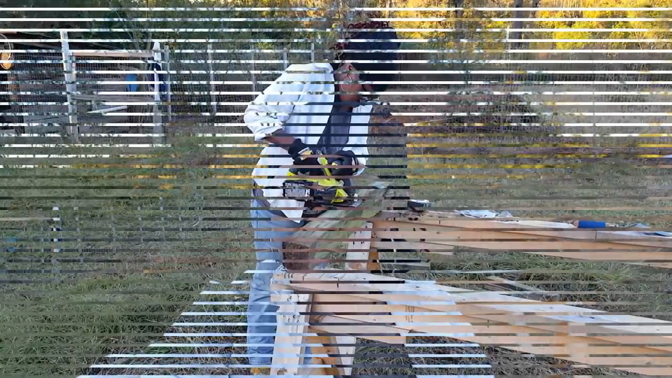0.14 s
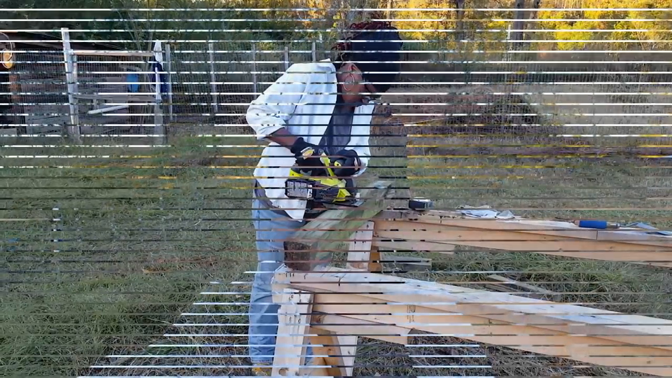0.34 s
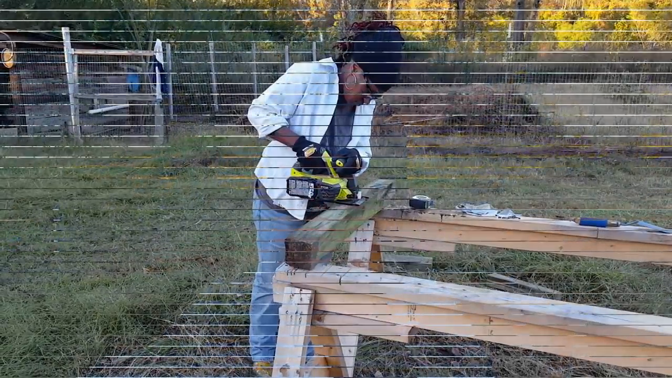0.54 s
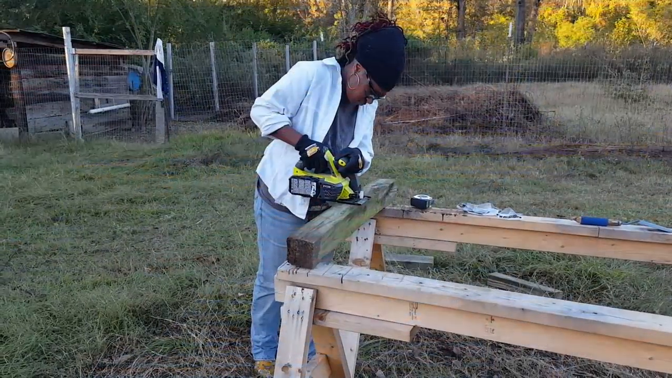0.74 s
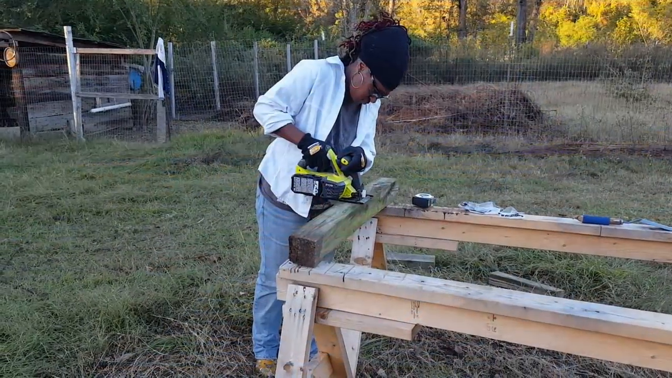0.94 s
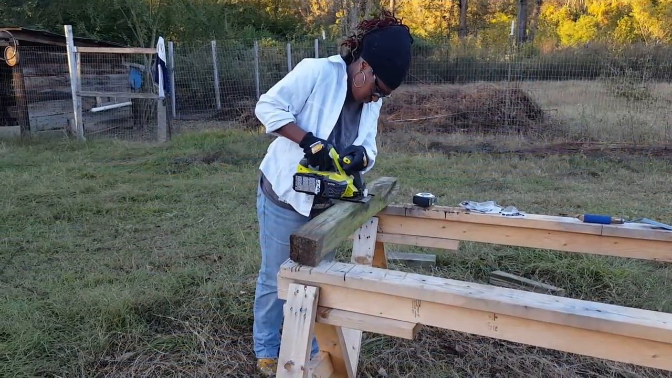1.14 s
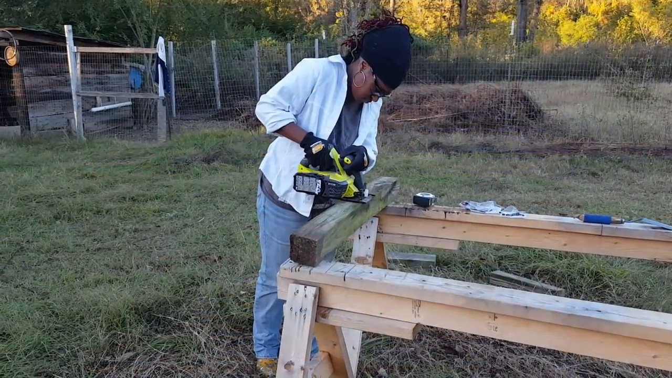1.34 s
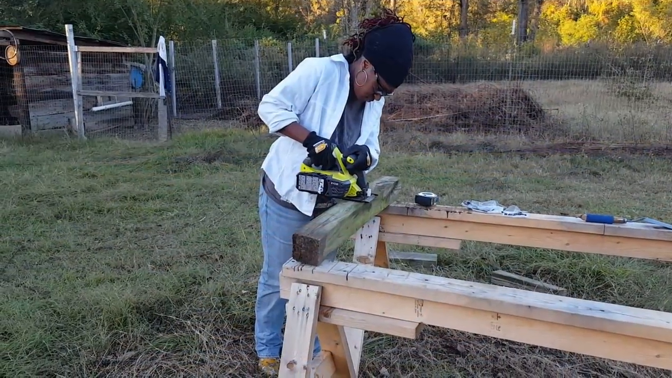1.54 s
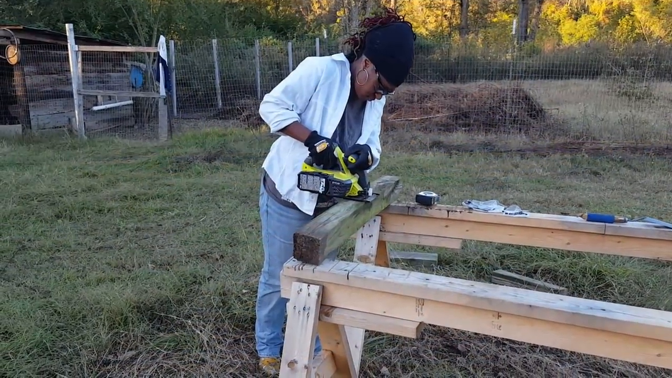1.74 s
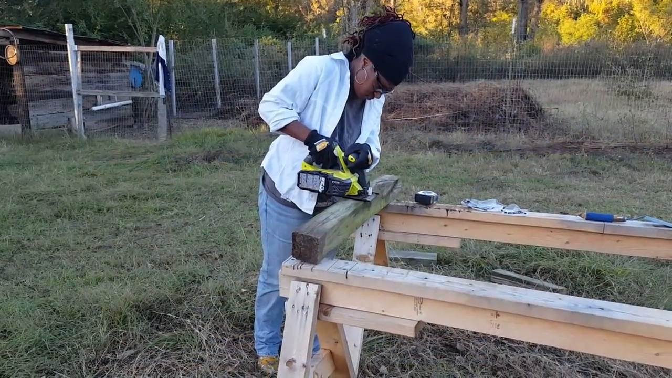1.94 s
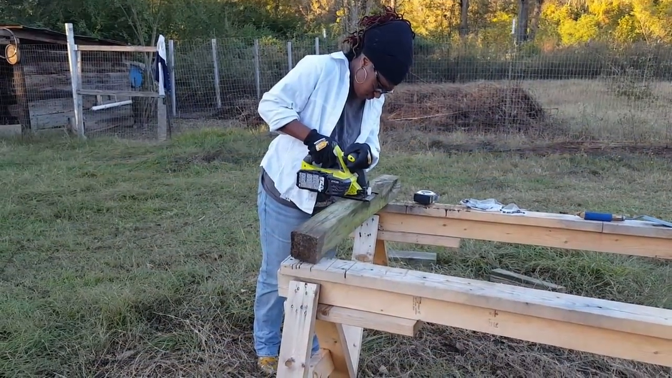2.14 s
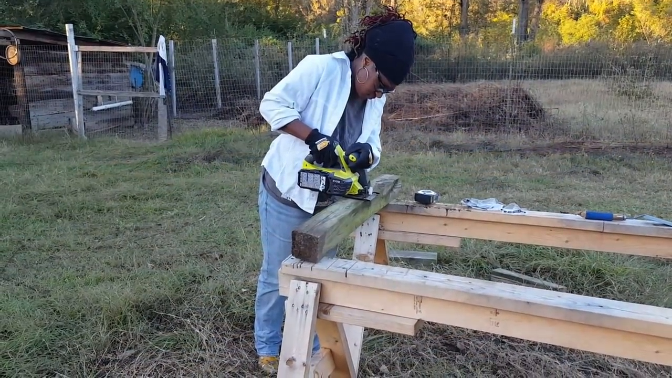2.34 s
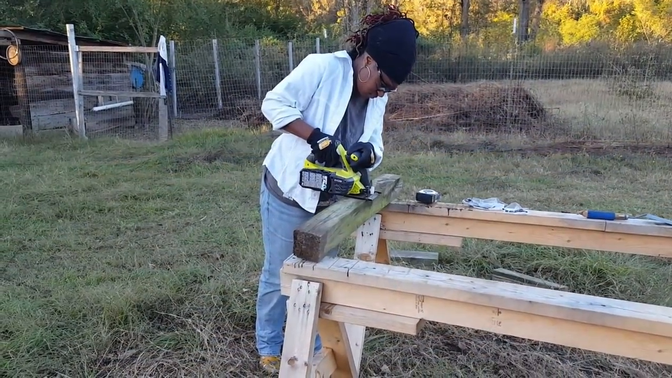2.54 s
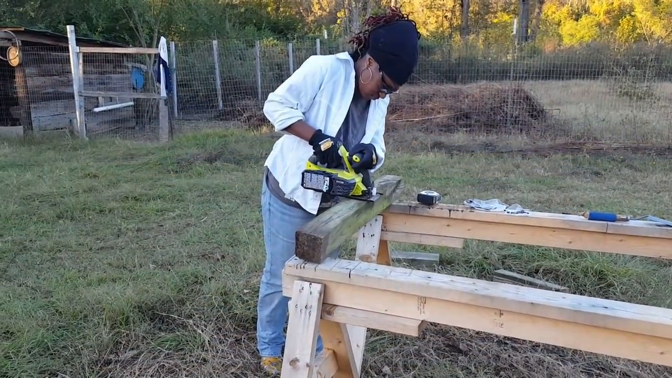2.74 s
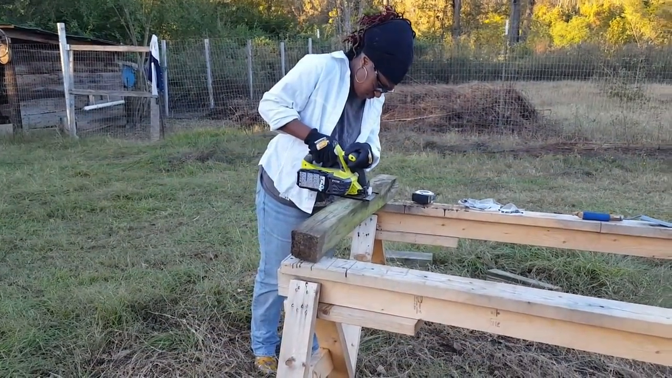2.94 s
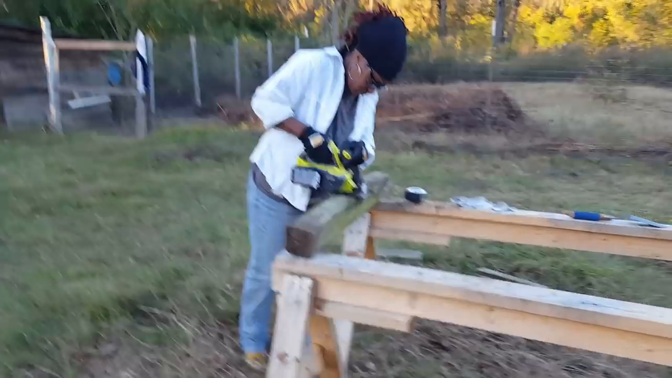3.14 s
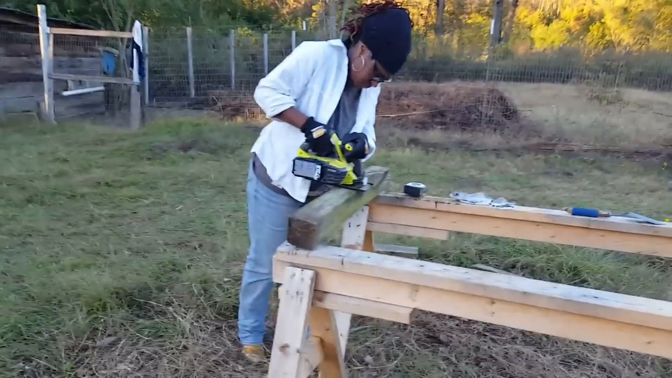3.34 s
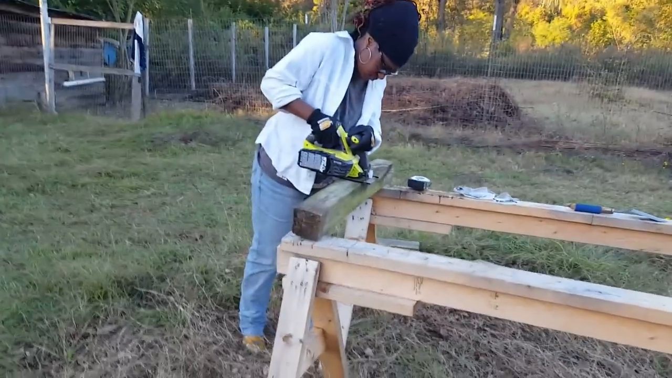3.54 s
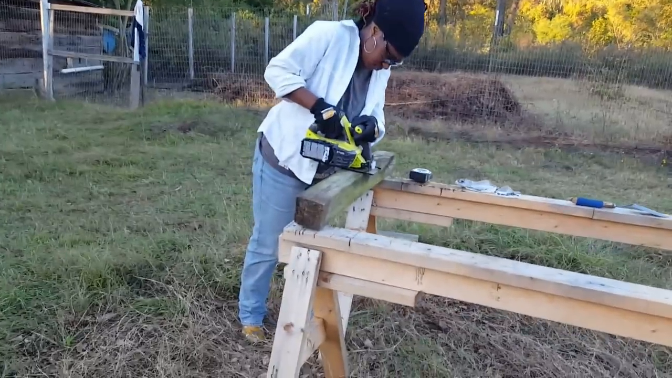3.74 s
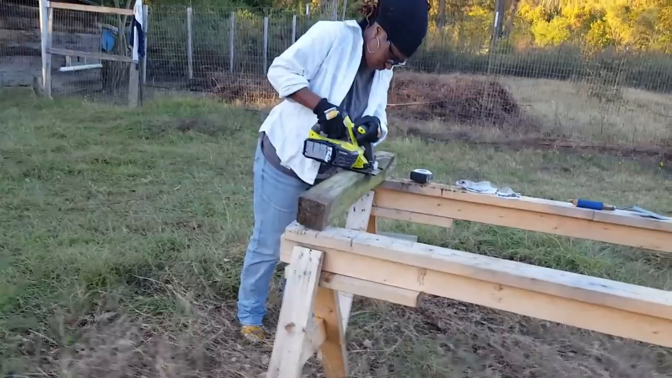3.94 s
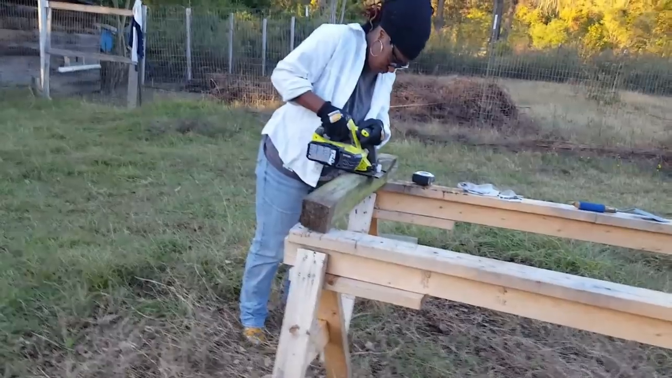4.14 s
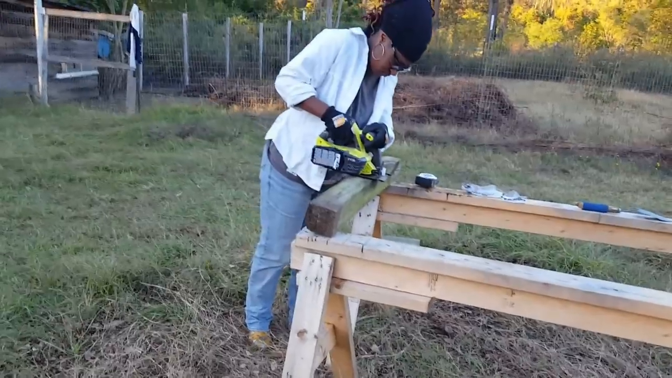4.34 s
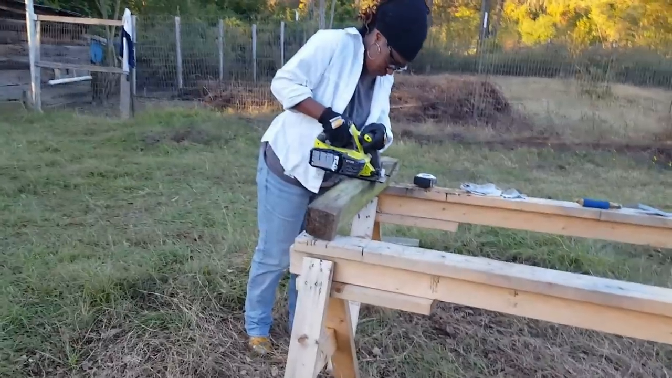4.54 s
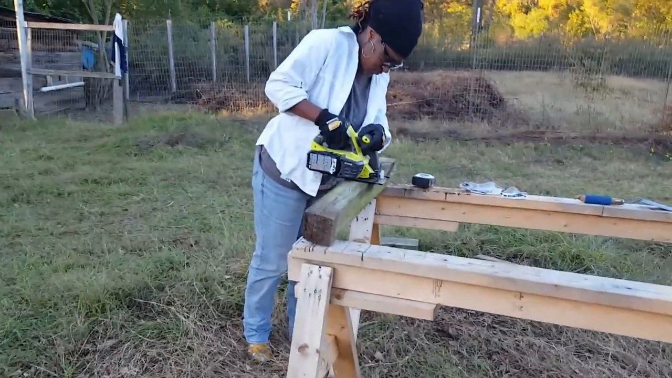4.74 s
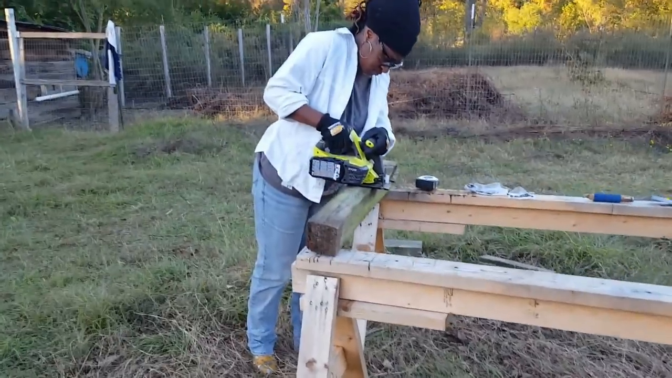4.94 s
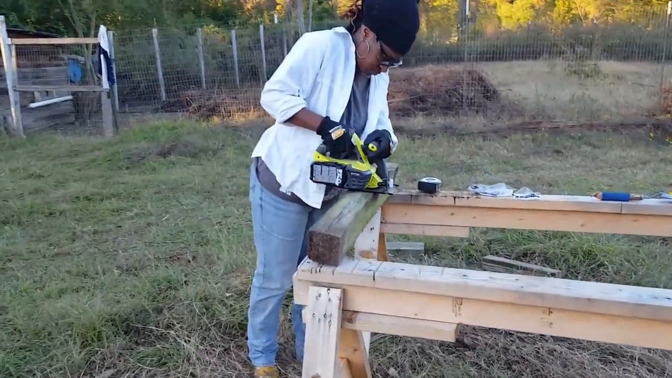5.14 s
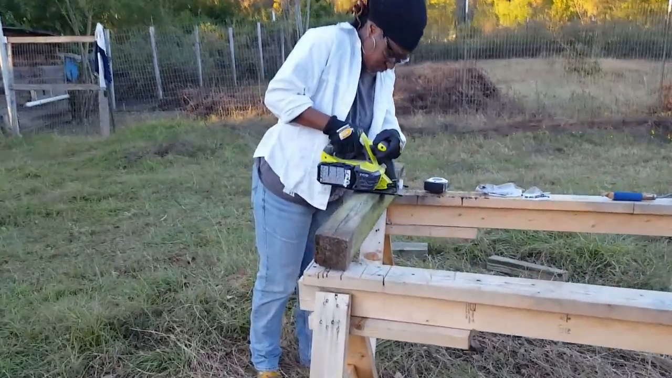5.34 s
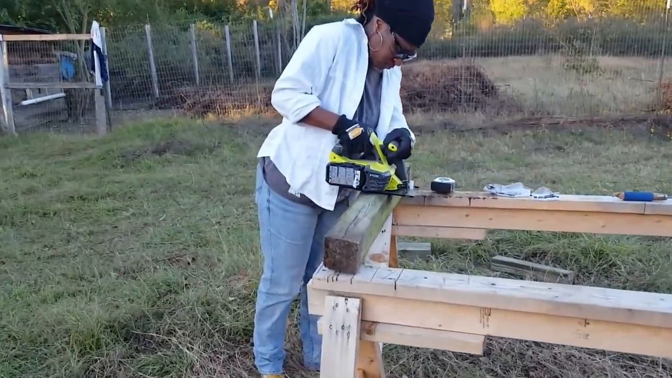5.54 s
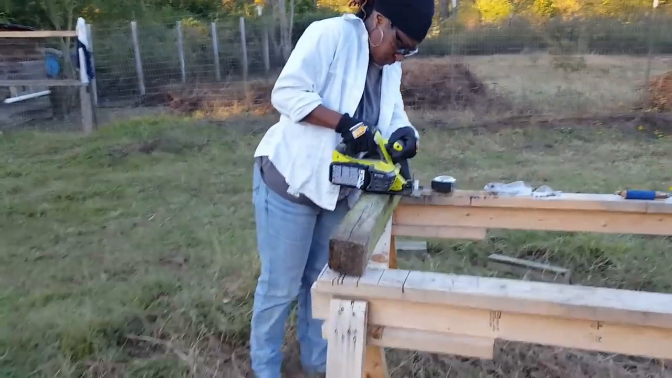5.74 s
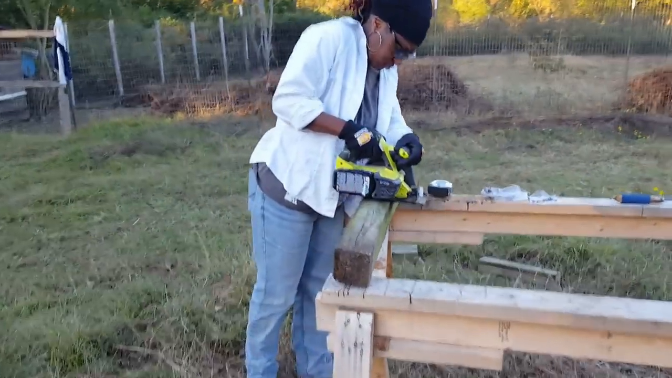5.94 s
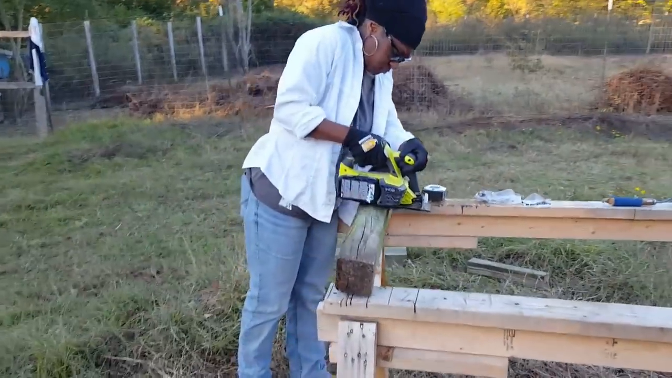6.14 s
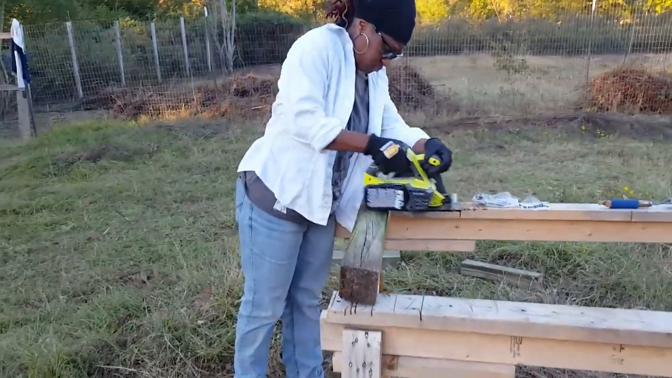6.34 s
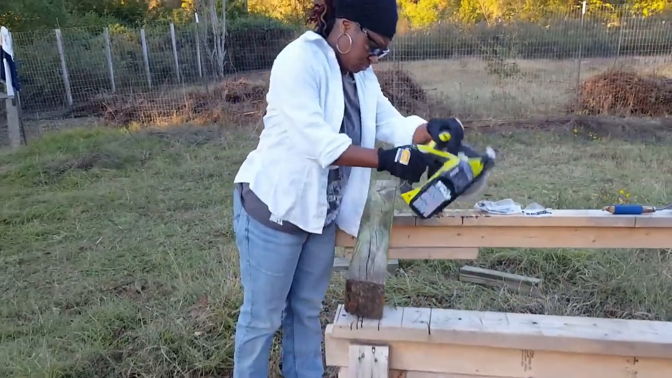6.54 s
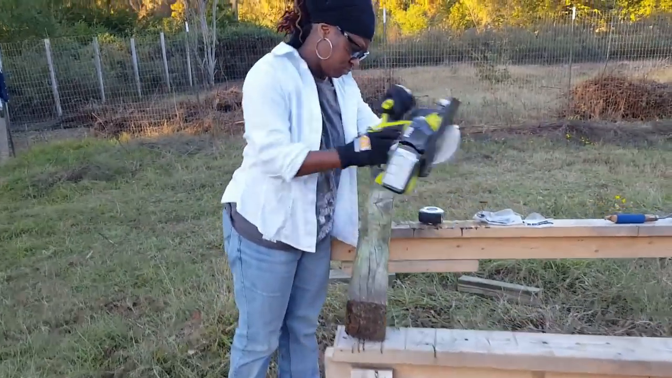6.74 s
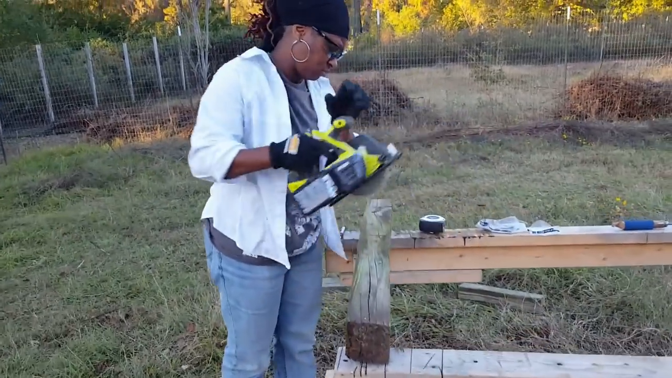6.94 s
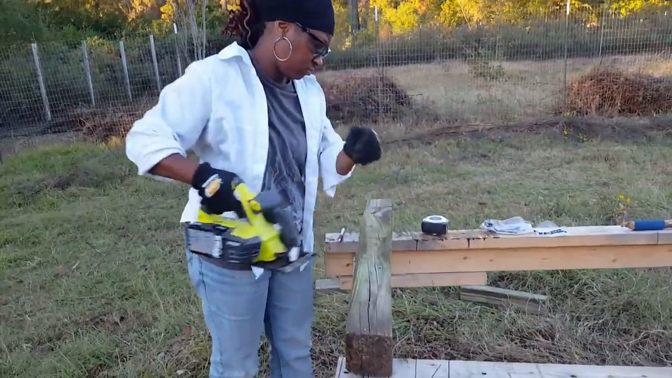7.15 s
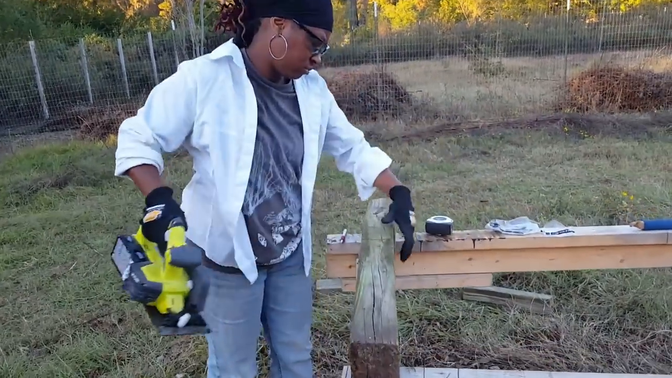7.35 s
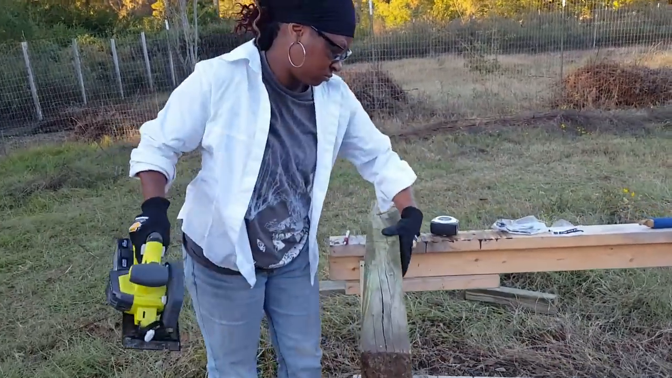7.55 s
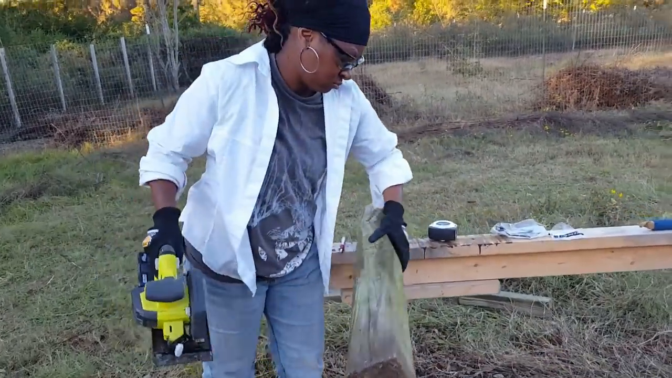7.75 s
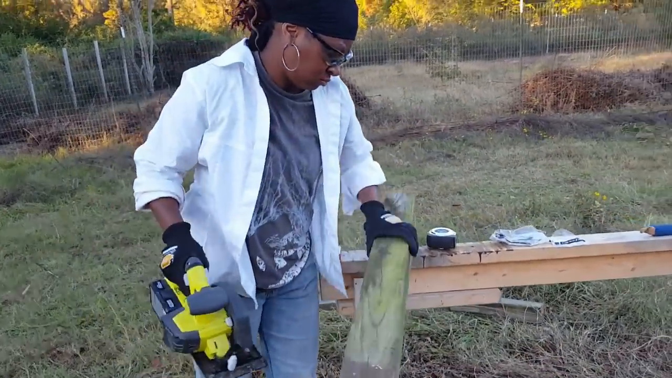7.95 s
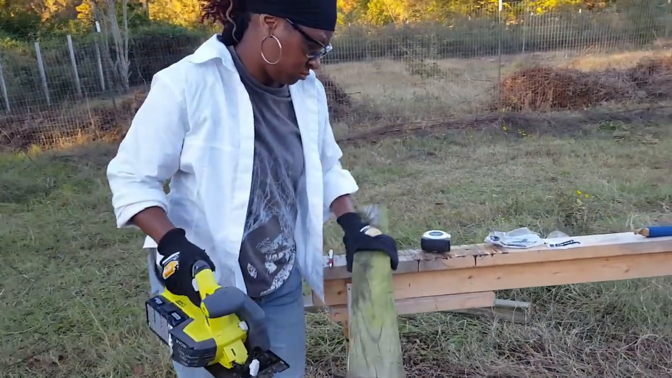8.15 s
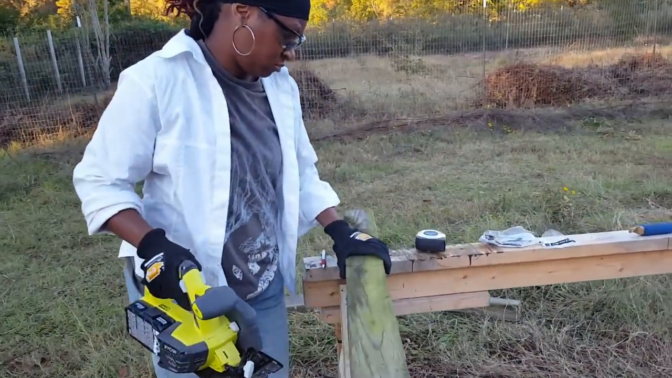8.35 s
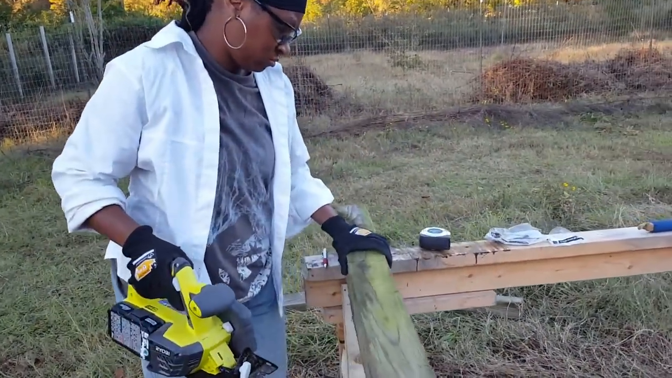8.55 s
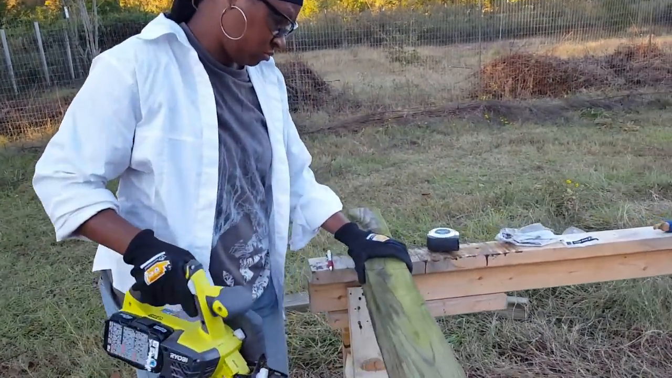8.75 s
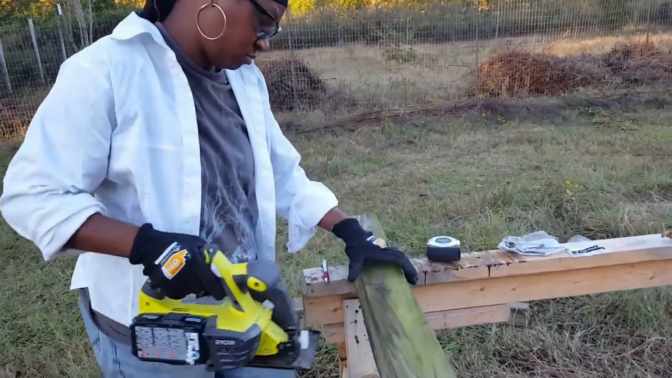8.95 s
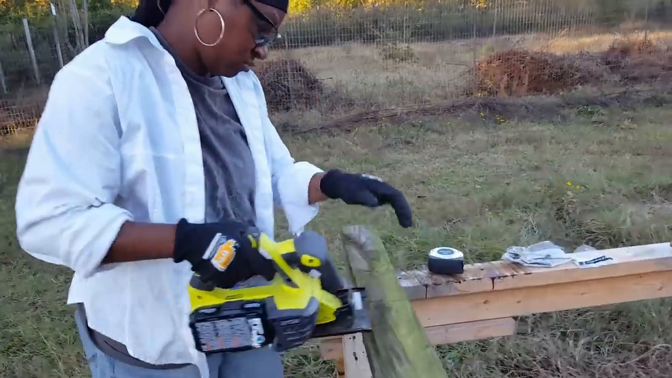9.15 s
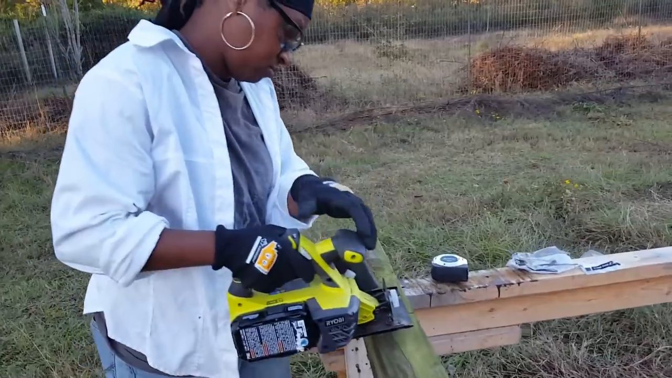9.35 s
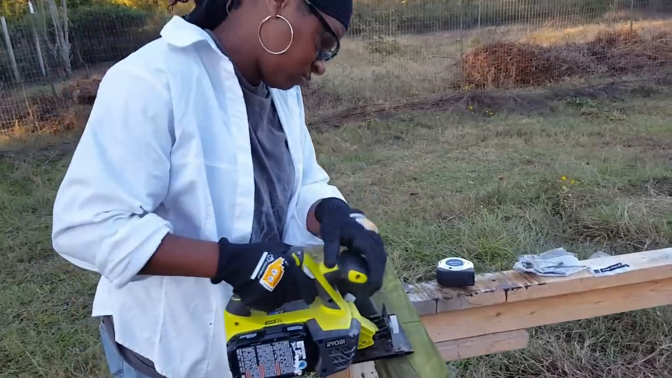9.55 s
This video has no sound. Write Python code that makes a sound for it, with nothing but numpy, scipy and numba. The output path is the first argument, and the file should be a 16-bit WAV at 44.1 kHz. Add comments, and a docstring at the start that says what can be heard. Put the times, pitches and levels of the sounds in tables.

```python
"""A small cordless saw bites through a wooden post in an open field, a few metres from a hand-held camera.
First come quick bursts of noise as the teeth strike and ring steel and housing, with whines of motor and gears.
Near 6.5 s the saw breaks free; it coasts down to single clacks while it is carried to the left.
Near 8.3 s the post is rolled over and knocks on its trestle: short pushes into decaying timber modes.
Two fainter knocks end it; filtered noise gives the still air underneath."""
import sys
import numpy as np
from scipy import signal
from scipy.fft import rfft, irfft, next_fast_len
from scipy.io import wavfile
from scipy.ndimage import uniform_filter1d, map_coordinates
from numba import njit

SR = 44100
rng = np.random.default_rng(int(sys.argv[2]) if len(sys.argv) > 2 else 0)


def dump_mix(stems):
    """Bounce the given channels to the path in sys.argv[1] as a 16-bit WAV at rate SR."""
    frames = np.atleast_2d(stems).T  # one column per channel
    limited = np.clip(frames, -1, 1)  # hard clip at full scale
    pcm = np.round(limited * 32767).astype(np.int16)
    wavfile.write(sys.argv[1], SR, pcm)


N = 423801
T = np.arange(N) / SR  # time of every sample, s
M = next_fast_len(N + 8192)  # transform length, samples
F = np.arange(M // 2 + 1) * SR / M + 1e-3  # transform frequencies, Hz; kept above zero for the logarithm

# when the saw turns to a new posture towards the microphones: turn_s
# the six postures: shallow cut, deeper, nearly through, lifted, lowered, held low
TURNS_S = (4.55, 5.7, 6.47, 7.36, 8.4)
# colour of the side signal against the mid: hz, side_over_mid_db
SIDE_COLOUR = [(60, -8.5), (300, -8), (1400, -21), (3000, -12.5), (7000, -7), (15000, -2)]


def undb(db):
    """Gain of a dB value."""
    return 10 ** (np.asarray(db) / 20)


def shape(table):
    """Gain at every frequency, joining (hz, db) points along a logarithmic frequency axis."""
    hz, db = np.transpose(table)
    return undb(np.interp(np.log(F), np.log(hz), db))


def through(x, gain):
    """Filter by a frequency response without phase shift."""
    return irfft(rfft(x, M) * gain, M)[..., :N]


def columns(table):
    """Every column of a timed table at every sample, joined by straight lines."""
    s, *rest = np.transpose(table)
    return [np.interp(T, s, column) for column in rest]


def wander(rate):
    """Random values joined by straight lines, rate of them a second."""
    return np.interp(T * rate, np.arange(400), rng.standard_normal(400))


@njit
def ring(x, hz, width):
    """State-variable band-pass on each channel, gain 1 at a centre that may move slowly."""
    y = np.empty_like(x)
    for channel in range(len(x)):
        band, low, g, damping = 0., 0., 0., 0.
        for i in range(len(hz)):
            if i % 32 == 0:
                g = np.tan(np.pi * hz[i] / SR)
                damping = width[i] / hz[i]
            v = (band + g * (x[channel, i] - low)) / (1 + g * (g + damping))
            band = 2 * v - band
            low = low + 2 * g * v
            y[channel, i] = damping * v
    return y


def postures():
    """Share of each posture at every sample, cross-faded over 0.26 s at each turn."""
    later = [np.clip((T - s) / 0.26 + .5, 0, 1) for s in TURNS_S]
    return -np.diff([np.ones(N)] + later + [np.zeros(N)], axis=0)


def field():
    """Faint still air over the grass: coloured noise, independent in mid and side."""
    # colour of the air, before its level is set: hz, relative_db
    air_colour = [(15, -18), (25, -12), (64, -14), (153, -8), (195, -18), (437, -10.5), (2090, -19.5),
                  (4000, -23), (14200, -33), (15900, -28)]
    mid_level_db = -54.5
    colour = shape(air_colour)
    mid, side = through(rng.standard_normal((2, N)), [colour, colour * shape(SIDE_COLOUR)])
    fade_in = np.clip((T - .054) / 0.25, 0, 1)
    return np.array([mid + side, mid - side]) * undb(mid_level_db) / np.std(mid) * fade_in


def hum():
    """Sines at the multiples of the shaft speed and passing whines, each wavering in pitch and level."""
    # drive shaft under load: time_s, shaft_hz, added_db
    shaft = [(0.06, 69, -4), (.5, 66.5, 2.5), (2.2, 66, 3.5), (4.2, 59.6, 4.5), (5.3, 48, 1)]
    # multiples of the shaft speed: order, level_db before the shaft's added_db
    shaft_orders = [(1, -64), (2, -94), (3, -64.5), (4, -107)]
    # whines of motor and gears, straight glides before waver: start_s, end_s, start_hz, end_hz, level_db
    whines = [(0.15, 1.296, 329, 320, -50), (1.152, 1.38, 1200, 1173, -30.5), (1.103, 1.296, 612, 592, -36),
              (2.41, 3.6, 502, 509, -45), (4.646, 5.002, 168, 161.6, -48), (5.51, 5.65, 1023, 1057, -32.5),
              (5.73, 6.19, 1030, 985, -32.5), (5.75, 6.048, 1264, 1166, -36),
              (6.25, 6.479, 1497, 1410, -29), (6.702, 7.745, 294.6, 140.5, -58),
              (7.549, 7.998, 770, 587, -50)]
    tracks = [[(s, order * hz, db + added_db) for s, hz, added_db in shaft] for order, db in shaft_orders]
    tracks += [[(start, hz, db), (end, end_hz, db)] for start, end, hz, end_hz, db in whines]
    waver_db, waver_share = 3.3, 0.00813  # spread of level and of pitch
    out = 0
    for track in tracks:
        hz, db = columns(track)
        level_waver, pitch_waver = [np.interp(T, np.arange(200) / 20, w)
                                    for w in rng.standard_normal((2, 200))]
        edge = np.clip(np.minimum(T - track[0][0], track[-1][0] - T) / 0.057, 0, 1)
        phase = 2 * np.pi * np.cumsum(hz * (1 + waver_share * pitch_waver)) / SR
        out = out + edge * undb(db + waver_db * level_waver) * np.sin(phase)
    return out * undb([[.7], [-.7]])  # a little stronger on the left


def knocks():
    """Each blow is a short push into the timber modes and a dense, noisy tail, strongest near its own band."""
    # blows on the timber: start_s, relative_db, contact_ms, ring_time_share, centre_hz, width_hz
    blows = [(6.5083, -16, 0.32, 0.42, 1150, 400), (6.5160, -19, 0.49, 1, 1050, 980),
             (6.5207, -13, 0.37, 0.2, 1590, 1400), (8.2941, -21, 0.2, 0.37, 1600, 2500),
             (8.2955, -13, 0.32, 0.92, 870, 2500), (8.3017, -9.5, 1.1, 0.94, 700, 1500),
             (8.3150, -19.5, 0.9, 0.83, 352, 800), (8.335, -32, 1.3, 0.91, 250, 600),
             (8.296, -23.5, 1.45, 0.94, 90, 200), (9.537, -43, 0.25, 0.54, 980, 2500),
             (9.575, -49, .3, 0.48, 1100, 900)]
    # timber modes: mode_hz, relative_db, t60_s before a blow's ring_time_share
    timber_modes = [(115, -19, 0.39), (192, -9, 0.14), (250, -5.5, 0.11), (400, -2.5, 0.11),
                    (592, 0.5, 0.047), (703, 0.5, 0.083), (882, 1, 0.12), (1004, -2, 0.12),
                    (1100, 11, 0.031), (1220, -7, 0.054), (1430, -29, .04), (1587, 11, 0.048),
                    (1920, -8, 0.065), (1980, -25, 0.036), (2510, -4, 0.035), (2680, -15, 0.037),
                    (3000, -20, .03)]
    tail_db, tail_t60_s = 12, 0.11  # the time is before a blow's ring_time_share
    mode_scatter_db = 2.0
    out = np.zeros(N + SR)
    t = T[:SR // 3]
    hz, mode_db, t60 = np.transpose(timber_modes)[:, :, None]
    chance = rng.standard_normal((len(blows), len(timber_modes), 1))
    for (s, db, contact_ms, share, centre_hz, width), scatter in zip(blows, chance):
        decay = np.exp(-np.log(1000) * t / (t60 * share))
        modes = undb(mode_db + mode_scatter_db * scatter) * np.cos(2 * np.pi * hz * t) * decay
        tail = undb(tail_db) * rng.standard_normal(len(t))
        swing = modes.sum(0) + tail * np.exp(-np.log(1000) * t / (tail_t60_s * share))
        band = centre_hz + 0 * t, width + 0 * t
        swing = ring(ring(swing[None], *band), *band)[0]
        # a longer contact sounds duller
        push = np.exp(-.5 * ((T[:256] * 1000 - contact_ms) / (contact_ms / 3)) ** 2)
        knock = np.convolve(swing, push / push.sum())[:len(t)]
        out[int(s * SR):][:len(t)] += undb(db) * knock
    return out[:N] * undb([[.4], [-.4]])  # a little stronger on the left


def strikes(rate, rub):
    """Envelope of the tooth blows: uneven while cutting, one by one while coasting, over a steady rub."""
    # timed clacks of the coasting teeth, strong and weak: time_s, db_over_lesser_clacks
    timed_clacks = [(7.3816, 3), (7.492, 1), (7.534, -2), (7.5658, 3), (7.628, 2), (7.6501, -11),
                    (7.701, 5.5), (7.7306, 2), (7.7688, 1), (7.827, 2), (7.883, -6), (7.9155, -7),
                    (7.944, -1), (7.991, 6), (8.0102, 7), (8.072, 3.5), (8.1045, -1), (8.142, 6),
                    (8.1893, 7), (8.224, 6), (8.244, 9), (8.2796, 2), (8.3291, -2), (8.418, -1),
                    (8.5226, 0), (8.6067, 4), (8.673, 6), (8.7332, 5), (8.756, 7), (8.8155, -7),
                    (8.8745, 2), (8.9697, 5), (8.991, 7.5), (9.0416, 8), (9.0901, 5.5), (9.1687, 5),
                    (9.191, 5), (9.231, 10), (9.2723, 14), (9.301, 14), (9.366, 7), (9.388, 5), (9.3974, 8),
                    (9.4347, -6)]
    slip, scatter_db = .1, 2.5  # lesser clacks: timing slip as a share of the gap, spread of strength
    chance = rng.standard_normal((2000, 4))
    turns = np.cumsum(rate) / SR  # teeth passed so far
    at = np.interp(np.arange(len(chance)) + 0.098 * chance[:, 0], turns, T)
    s, db = np.transpose(timed_clacks)
    cutting = (at > 0) & (at < s[0])
    kicks = np.zeros(N)
    np.add.at(kicks, (at[cutting] * SR).astype(int), undb(3.8 * chance[cutting, 1]))
    # a whole number of teeth passes between two timed clacks
    gaps = np.maximum(np.round(np.diff(np.interp(s, T, turns))), 1)
    tooth = np.r_[0, np.cumsum(gaps)]
    lesser = np.setdiff1d(np.arange(int(tooth[-1])), tooth.astype(int))
    ticks = np.interp(lesser + slip * chance[lesser, 2], tooth, s)
    clacks = np.zeros(N)
    clacks[(ticks * SR).astype(int)] = undb(scatter_db * chance[lesser, 3])
    clacks[(s * SR).astype(int)] = undb(db)
    t = T[:2048]
    rise = (1 - np.exp(-t / 0.0017)) ** 2
    # coasting clacks die away more slowly than the cutting bursts
    cutting_bursts = np.convolve(kicks, rise * np.exp(-t / .0029))[:N]
    coasting_bursts = np.convolve(clacks, rise * np.exp(-t / .0045))[:N]
    return cutting_bursts + coasting_bursts + rub


def body(grit, weights):
    """Broad colour of each posture, then resonances that each swell and drift, then the housing's shading."""
    # broad colour, one list per posture, each evened to the same spread of gain: hz, relative_db
    colours = [
        [(35, -61), (60, -29), (227, -22), (490, -16.5), (1110, -9.5), (1690, 2), (1850, 3), (2340, 4.5),
         (3480, -13), (4200, -14), (6540, -15.5), (9280, -12), (15900, -22.5)],
        [(35, -76), (60, -39), (160, -23), (490, -22.5), (764, -14), (1110, -13.5), (1690, -7.5), (3400, -12.5),
         (4200, -15.5), (6540, -11.5), (9280, -10), (15900, -21.5)],
        [(35, -71), (60, -36), (526, -24.5), (1010, -16), (1110, -15.5), (1650, -3.5), (3030, -7.5), (3320, -7),
         (4100, -9.5), (6540, -12.5), (9060, -11.5), (15900, -23)],
        [(35, -63), (60, -35), (502, -12), (591, -15), (764, -6), (1110, -7), (2450, 1.5), (3500, -4),
         (4150, -9), (5060, -11), (9280, 0.5), (15900, -27)],
        [(35, -49), (60, -44), (407, -17.5), (514, -18), (800, -10), (1110, -13), (1570, -8), (4200, -8.5),
         (5060, -19.5), (6540, -6), (10400, -14.5), (15900, -29)],
        [(35, -41), (60, -23), (184, -10.5), (307, -15), (446, -1.5), (591, -8), (729, -5), (1650, 2),
         (2040, -1.5), (5180, -8), (7520, -12), (15900, -31)],
    ]
    # resonances: hz, least_width_hz, then db over the broad colour in each of the six postures
    rings = [(786, 34, 0.5, -6, -12, 0, 3, 7.5), (1584, 82, 1, 4, 5, -1, 9, -14),
             (1876, 43, -2.5, 9.5, 11.5, 0, -1, 4), (2326, 16, 5.5, 8, 9.5, -5, -7, -11),
             (2500, 200, -2, -3, 4, 6.5, -15, 0), (2746, 58, 1, -12, 6.5, 2.5, 2, 9),
             (2982, 34, 9.5, 2, 11, 4, 4, 7), (3215, 72, 4, -5, -26, 6, 2, 19),
             (4023, 35, 2.5, -17, 5, 6, 6, 13), (4320, 21, 7, -4, -29, 18.5, 4, 15),
             (4610, 15, -9, 6, 5, -29, -5, 3), (5300, 20, 6, 3, 8.5, -3, -3, -9),
             (5760, 31, 3.5, -0.5, -4, 8, 4, -12), (6210, 31, 4.5, -1, 6, 10.5, 4.5, -11),
             (6680, 310, -2.5, -14, -14, 1, 6.5, 0), (7390, 490, 0, -4, 0, 3.5, -12, 8),
             (8130, 40, -3, 1, 6, 0, 5, 8), (8660, 124, 3, -3.5, 5.5, -34, -28, -11),
             (10610, 100, -39, 7, 4, 8, 20, 19.5), (11360, 220, -15, 0, -2, -7, 10, 8),
             (12450, 260, -5, 4, 4, 6, 2, 1), (13170, 170, 2, 6, 6, 14, 13, 12)]
    # resonances that slide in pitch: least_width_hz, (hz in each posture), (db over broad in each posture)
    slides = [(36.4, (1687, 1703, 1648, 1690, 1730, 1620), (11.9, 13.3, 14.7, 10, 6.4, 8.2)),
              (442, (9410, 9100, 9200, 9050, 9050, 9200), (5, 11.5, -1.5, 9, 9, 8)),
              (37.2, (1442, 1440, 1475, 1440, 1460, 1460), (7, 5.5, 7.5, 2, -7, 2)),
              (147, (4110, 4240, 4150, 4170, 4130, 4200), (-6, 10, 7, 6, -10, 10))]
    # bands shaded by the housing: hz, width_hz, depth_0_to_1
    shadows = [(1364, 270, 0.37), (1934, 87, 0.24), (3340, 167, 0.31), (5120, 290, 0.15), (6460, 89, 0.47),
               (10630, 480, 0.34), (11550, 240, 0.07)]
    broad = 0
    for weight, table in zip(weights, colours):
        colour = shape(table)
        broad = broad + weight * through(grit, colour / np.std(colour))
    tracks = [(hz + 0 * T, width, np.dot(db, weights)) for hz, width, *db in rings]
    # pitches glide from the middle of one posture to the next
    edges = np.r_[0, TURNS_S, T[-1]]
    middles = (edges[1:] + edges[:-1]) / 2
    tracks += [(np.interp(T, middles, hz), width, np.dot(db, weights)) for width, hz, db in slides]
    out = .9 * broad
    moving = 1 + (T > TURNS_S[2])  # the rings waver twice as much, at random, once the saw is free
    for hz, width, db in tracks:
        swell = undb(db + moving * 2.5 * (wander(2) + wander(6)) / 1.4)
        # high rings are damped harder, all of them once the saw is free
        damped_width = moving * hz * (hz / 60000.) ** 2 + (moving - 1) * hz / 25
        drifting_hz = hz * (1 + moving * .005 * wander(3))
        out = out + swell * ring(broad, drifting_hz, np.maximum(width, damped_width))
    shading = 1
    for hz, width, depth in shadows:
        shading = shading * (1 - min(depth, .95) / (1 + (2 * (F - hz) / width) ** 2))
    return through(out, shading)


def free_steel(out):
    """The blade's narrow resonances sing throughout, swelling as the cut opens and then quickly damped."""
    # blade resonances: hz before a slight drift, width_hz, relative_db
    blade = [(1188, 6.5, 10), (1456, 7.3, 13), (1654, 3.4, 4.5), (2279, 3.5, 20), (2670, 11, 13),
             (3058, 36, -4), (4200, 17, -21), (4570, 53, 7)]
    sing_db, open_db = -11.5, 15  # constant part, and the rise at the opening
    open_s, swell_s, damp_s = 6.45, 0.22, 0.052
    fall_s = np.where(T < open_s, swell_s, damp_s)
    level_db = sing_db + open_db * np.exp(-np.abs(T - open_s) / fall_s)
    song = 0
    for hz, width, db in blade:
        song = song + undb(db) * ring(out, hz * (1 + 0.0015 * wander(4)), width + 0 * T)
    return undb(level_db) * song


def saw():
    """Bursts of grit ring the saw; timber, housing, steel and hiss swell on their own in four bands."""
    # levels before random swells: time_s, housing_db, then timber_db, steel_db, hiss_db over the housing
    band_levels = [(0.06, -45, -9, 1, 0), (0.14, -34.5, -10.5, -1, -1.5), (0.36, -23, -13.5, -5, -3.5),
                   (0.56, -28, -10, -2.5, -2.5), (1.12, -24, -11, -2.5, -1.5), (1.27, -21, -15.5, -2, 0),
                   (1.48, -26.5, -11, -4, 1.5), (2.55, -23, -12.5, -4.5, -1.5),
                   (2.7, -19.5, -15.5, -7, -4.5), (2.81, -17, -13, -9.5, -2), (2.9, -21, -12.5, -7.5, -1),
                   (3.3, -26, -12, -5, -1.5), (3.5, -24, -12.5, -4.5, 0.5), (4.93, -23.5, -10.5, -3, 1.5),
                   (5.0, -22.5, -13, -4.5, 1), (5.3, -19.5, -16.5, -3.5, -0.5), (5.65, -21, -14, -2, -0.5),
                   (5.85, -17.5, -13, -5.5, 0), (6.39, -18.5, -10.5, -1.5, -3),
                   (6.45, -18, -18, -10, -14.5), (6.6, -27, -11.5, -10, -8), (6.8, -27, -12, -12, -10.5),
                   (6.86, -27, -11, -0.5, -0.5), (7.16, -27.5, -9, -2, -1.5), (7.31, -27, -11, -16, 0.5),
                   (7.37, -34.5, -10, -3, 0), (7.52, -30.5, -11.5, -10, -4.5), (7.65, -31, -11.5, 2, -0.5),
                   (7.9, -32, -11.5, -8, -5), (8.4, -37.5, -6.5, -3.5, -4.5), (8.9, -42.5, -2.5, -10, -7.5),
                   (9.0, -42, -3.5, -15, -14.5), (9.33, -53.5, -3, -6, -10), (9.4, -51, -1.5, -4, -6),
                   (9.5, -70, 2, -5, 5)]
    # borders between timber, housing, steel and hiss: border_hz
    splits_hz = (1300, 3400, 5200)
    # drive: time_s, tooth_strikes_per_s, steady_rub_0_to_1
    drive = [(0, 216, 0.5), (4, 174, 0.5), (6.4, 171, 1), (6.6, 139, 0.23), (7.35, 85, 0.29),
             (7.6, 68.4, 0.2), (8.0, 64, 0.09), (8.85, 59, 0.26), (9.0, 52, 0.04), (9.6, 50, 0.08)]
    # where the saw stands, one value per posture: left_minus_right_db
    pan = (-0.087, -0.58, -0.72, -0.02, 0.67, 0.6)
    grit = strikes(*columns(drive)) * rng.standard_normal((2, N))  # mid and side
    grit[1] = through(grit[1], shape(SIDE_COLOUR))
    weights = postures()
    rung = body(grit, weights)
    housing_db, timber_db, steel_db, hiss_db = columns(band_levels)
    pan_db = np.dot(pan, weights)
    shared_swell_db = .7 * wander(9)  # small random swells shared by all four bands
    below = [0] + [1 / (1 + (F / hz) ** 12) for hz in splits_hz] + [1]
    out = 0
    for k, db in enumerate((timber_db, 0, steel_db, hiss_db)):
        part = through(rung, below[k + 1] - below[k])
        # even out the slow level of the mid, then give the band its own
        slow_power = uniform_filter1d(uniform_filter1d(part[0] ** 2, size=5000), size=5000)
        level_db = housing_db + shared_swell_db + db + 1.0 * wander(12)
        out = out + undb(level_db) * part / np.sqrt(slow_power + 1e-18)
    out = out + free_steel(out)
    fade = np.clip((T - .054) / 0.025, 0, 1) * np.clip((9.53 - T) / 0.042, 0, 1)
    left = fade * (out[0] + out[1])
    right = fade * (out[0] - out[1])
    return np.array([left * undb(pan_db / 2), right * undb(-pan_db / 2)])


def scene():
    """All sources at the camera; saw and knocks reach the left microphone first once the saw is carried aside."""
    # delay of the right microphone behind the left, one value per posture: delay_samples
    left_lead = (.75, -.1, -.1, .4, 6, 5.5)
    left, right = saw() + knocks()
    late = map_coordinates(right, [np.arange(N) - np.dot(left_lead, postures())], order=3)
    return np.array([left, late]) + hum() + field()


def record(dry):
    """The two microphones colour the sound; the recorder clips at full scale, then cuts the top."""
    # how the microphones differ in colour: hz, left_minus_right_db
    mic_colours = [(60, 2), (500, 1.5), (1200, 1.3), (4000, 0.6), (8000, 2.5), (13000, 2)]
    top_hz = 15900
    half = np.sqrt(shape(mic_colours))
    heard = through(dry, [half, 1 / half])
    low_pass = signal.ellip(10, .2, 75, top_hz, fs=SR, output="sos")
    return signal.sosfilt(low_pass, np.clip(heard, -1, 1))


dry = scene()
out = record(dry)
dump_mix(out)
```